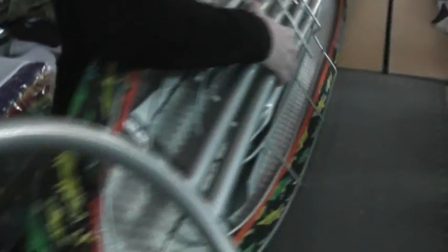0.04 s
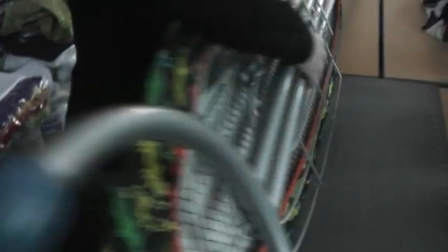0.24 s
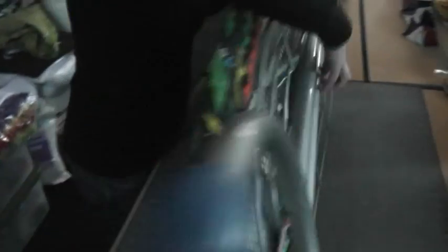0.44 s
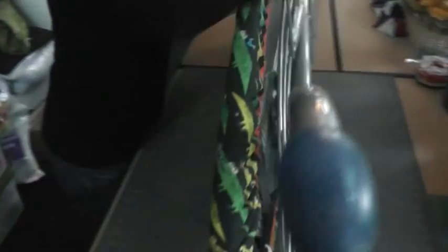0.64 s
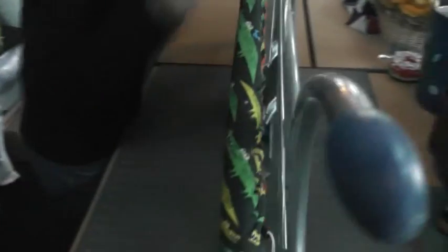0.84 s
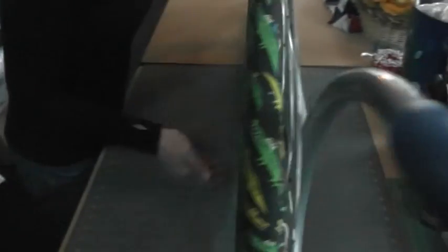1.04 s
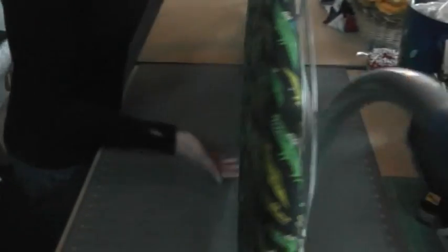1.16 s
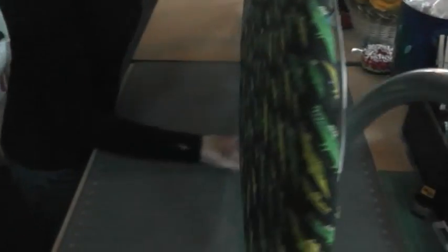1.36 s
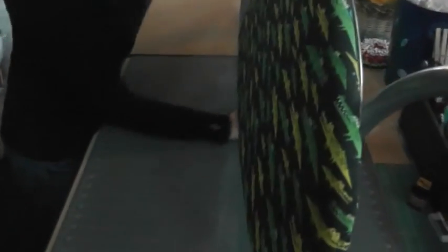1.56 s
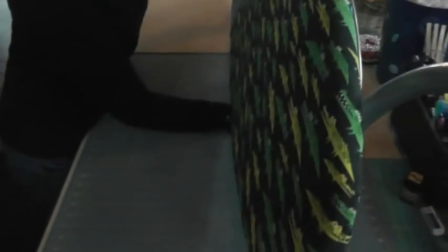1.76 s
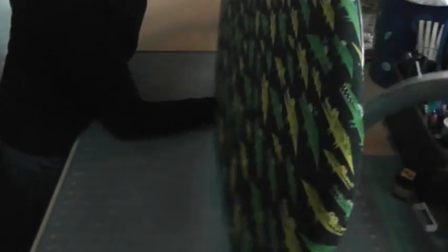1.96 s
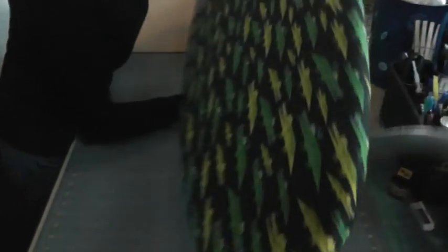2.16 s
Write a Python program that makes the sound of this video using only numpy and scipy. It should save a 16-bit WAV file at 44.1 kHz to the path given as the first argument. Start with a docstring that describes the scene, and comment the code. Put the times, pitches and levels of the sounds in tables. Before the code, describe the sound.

Metal ironing board flipped by hand on a table, with clanks, knocks, a sharp snap and scraping

```python
"""In a small room, a folded metal ironing board is turned over by hand on a table, heard from close by.
Its legs clank on the frame, a latch snaps and a tube rings: noise cracks, damped sines and a noise-like mesh.
The padded board thuds, knocks and booms on the table and finally scrapes along it in noisy slips.
Cloth swishes as shaped noise, over room noise and the faint wavering sines of a fan."""
import sys
import numpy as np
from scipy import signal
from scipy.fft import rfft, irfft, next_fast_len
from scipy.io import wavfile
from scipy.ndimage import map_coordinates

SR = 44100
rng = np.random.default_rng(int(sys.argv[2]) if len(sys.argv) > 2 else 0)


def log_audio(samples):
    """Write samples as a 16-bit WAV file to the path given in sys.argv[1]."""
    # one column per channel
    frames = np.atleast_2d(samples).T
    # limit to full scale, then quantise
    limited = np.clip(frames, -1, 1)
    pcm = np.round(limited * 32767).astype(np.int16)
    wavfile.write(sys.argv[1], SR, pcm)


N = 97108
T = np.arange(int(.8 * SR)) / SR  # time within one blow [s]

# Colours and mode levels are relative; tilt is about 1 kHz and held below 150 Hz.
# still room noise: (frequency [Hz], level [dB])
FLOOR_COLOUR = [(15, -61), (25, -29), (117, -24.5), (276, -12.5), (358, -3.5), (441, -21), (989, -21.5),
                (1160, -21), (2740, -29), (7370, -29), (12800, -48), (16600, -70.5), (22000, -120)]
FLOOR_DB = -69.5
# fan hum and whine: (frequency [Hz], level [dB], waver rate [1/s])
FAN_TONES = [(365.6, -66, 17), (11980, -91.5, 7.4)]
# low air noise, independent left and right: (frequency [Hz], level [dB])
AIR_COLOUR = [(20, -6), (40, 10), (75, -26), (130, 2), (300, -16), (1000, -58)]
AIR_DB = -72.5
# room decay: (frequency [Hz], t60 [s])
ROOM_T60 = [(100, 0.26), (500, 0.5), (3000, 0.38), (10000, 0.34)]
ROOM_DB, ROOM_RISE_S, WALLS_T60_S = -13, 0.0048, .16
# side against middle: (frequency [Hz], level [dB])
SIDE_COLOUR = [(30, -14), (70, -8), (160, -11), (1000, -10), (2500, -11.5), (4800, -14.5), (8000, -14),
               (12000, -8)]
LEFT_DB = -0.38  # right gets the opposite
LOW_CUT_HZ, TOP_HZ = 47, 12900

# cloth under the hands: (start [s], end [s], level [dB])
SWISHES = [(-.05, 0.28, -65), (0.608, 0.685, -57), (1.286, 1.46, -72.5), (1.506, 1.79, -61)]
# cloth noise: (frequency [Hz], level [dB])
SWISH_COLOUR = [(200, 1), (700, 2.5), (2000, -0.5), (5000, -1), (8000, -2), (11000, -7.5), (12800, -10.5)]
SWISH_RISE_S, SWISH_FALL_S = 0.11, 0.069
SWISH_SWING_DB, SWISH_SWING_PER_S = 1.1, 60.6

# light touches of wire and fittings: (time [s], level [dB], tilt [dB/octave], t60 [s])
TICKS = [(.138, -62.5, 1, 0.29), (0.2443, -49, 11, 0.016), (.358, -41, 0.5, 0.21), (.696, -49, -8.5, .015),
         (.746, -59.5, -6, 0.054), (.859, -58, 19.5, 0.018), (0.987, -65, -6, 0.019),
         (1.1618, -60.5, -4, 0.052), (1.25, -59, 4.5, 0.33), (1.3259, -46.5, -2, 0.027),
         (1.893, -44.5, -5, 0.079)]
# tick noise: (frequency [Hz], level [dB])
TICK_COLOUR = [(200, -16), (1100, -5), (2400, 4), (5000, -1.5), (9000, -18), (12800, -30.5)]

# table booming under the board's weight: (time [s], level [dB])
BOOMS = [(.185, -45), (.44, -59), (.835, -54), (1.178, -51), (1.534, -56), (1.94, -49)]
# boom noise: (frequency [Hz], level [dB])
BOOM_COLOUR = [(30, -31), (55, -7), (75, -4), (115, -9), (150, -14), (400, -46.5)]
BOOM_RISE_S, BOOM_T60_S = 0.018, 0.26

# board dragging on the table: (time [s], level [dB])
DRAG_LEVEL = [(0, -57), (.17, -64), (.3, -51.5), (.5, -51.5), (.65, -60.5), (.87, -59), (.98, -77),
              (1.1, -63), (1.3, -63), (1.46, -66), (1.58, -66), (1.87, -67.5), (2.2, -58)]
# drag rumble: (frequency [Hz], level [dB])
DRAG_COLOUR = [(25, -12.5), (50, -13.5), (90, 0.5), (170, -1.5), (300, -1), (600, -9.5), (1200, -13.5),
               (2500, -26.5), (8000, -40)]
DRAG_SWING_DB, DRAG_SWING_PER_S = 1.3, 35
# edge scraping at the end: (time [s], level [dB])
SCRAPE_LEVEL = [(1.92, -77.5), (1.96, -62), (2.035, -52.5), (2.047, -48), (2.105, -46), (2.115, -43),
                (2.145, -44.5), (2.165, -42), (2.2, -45)]
# scrape noise: (frequency [Hz], level [dB])
SCRAPE_COLOUR = [(30, -22), (85, 4), (130, -17.5), (220, 3.5), (400, -3), (600, 0.5), (780, -2.5),
                 (1000, -13), (1400, -11.5), (2500, -26), (4000, -21.5), (7000, -27), (9000, -41),
                 (12800, -49.5)]
SLIPS_PER_S, SLIP_SCATTER_DB, SLIP_DECAY_S = 344, 2, .004
SCRAPE_GRIT = 1  # steady noise against slips, rms ratio
# resonances under the scrape: (frequency [Hz], level [dB])
SCRAPE_MODES = [(240, -8), (364, 6), (437, 6), (547, 6.5)]
SCRAPE_MODE_HALF_WIDTH_HZ = 11.3

# padded board bumping on the table: (time [s], level [dB], tilt [dB/octave])
THUDS = [(0.024, -46, -10), (0.098, -52, -26), (0.1808, -40.5, 1), (0.212, -47, 4), (.231, -52.5, -8),
         (0.257, -46, 2.5), (.268, -44, -18), (.31, -52, -4), (.356, -45.5, 3.5), (.442, -42.5, 3),
         (0.512, -47.5, 11), (0.7318, -56.5, 3), (0.745, -58.5, 5.5), (0.8308, -49, 2.5),
         (1.1617, -35.5, -1), (1.1753, -43, -5), (1.195, -50, 4), (1.25, -57, -12), (1.325, -55.5, 3),
         (1.55, -60, -12), (1.922, -43, -13), (1.95, -46.5, -14)]
# thud noise: (frequency [Hz], level [dB])
THUD_COLOUR = [(30, -37), (70, -24), (120, -7), (190, 1.5), (280, -1), (450, -4), (650, -13.5), (1000, -24),
               (2000, -33.5), (5000, -40.5), (12000, -70.5)]
# thud decay: (frequency [Hz], t60 [s])
THUD_T60 = [(70, 0.65), (200, 0.28), (600, 0.12), (3000, .08)]
# board modes: (frequency [Hz], level [dB], t60 [s])
BOARD_MODES = [(177.4, -5, 0.13), (202.5, -5, 0.12), (243.7, 5.5, 0.064), (281, -6, 0.059), (404, -6, 0.05),
               (560, -12, 0.034)]
THUD_DB, BOARD_DB, BOARD_LOW_CUT_HZ = -2, -0.5, 140

# hard knocks of the rim: (time [s], level [dB], pitch of the struck spot [Hz])
KNOCKS = [(0.0161, -51, 642), (.1805, -36.5, 472), (0.2453, -47, 813), (0.357, -48, 526), (.511, -39, 1883),
          (0.7306, -53, 393), (0.747, -52, 1057), (.8305, -51.5, 1313), (.988, -59, 1140),
          (1.088, -62, 770), (1.1615, -52, 520), (2.112, -41, 535)]
# knock noise: (frequency [Hz], level [dB])
KNOCK_COLOUR = [(60, -16), (200, -7), (400, 8.5), (700, 3.5), (1150, -15), (1700, -15), (2500, -38),
                (8000, -37)]
KNOCK_T60_S, SPOT_T60_S, SPOT_DB = .03, .06, -1

# crowded modes of the mesh: (frequency [Hz], level [dB])
MESH_COLOUR = [(60, -30), (170, -5), (400, -6.5), (900, -3.5), (1600, -3.5), (2600, -3.5), (3500, -2.5),
               (4500, 0), (6000, -2.5), (8000, -5), (10500, -7), (12800, -28)]
# mesh decay: (frequency [Hz], t60 [s])
MESH_T60 = [(150, 0.67), (1000, 0.47), (3000, 0.45), (7000, 0.24), (12000, 0.093)]
MESH_DB = -9

# loose leg tube chattering: (time [s], level [dB])
TUBE_HITS = [(.4497, -32.5), (0.4532, -30), (1.1615, -65.5)]
# tube modes: (frequency [Hz], level [dB], t60 [s])
TUBE_MODES = [(1854, -19, 0.4), (2285, -12, 0.18), (2324, -2.5, 0.35), (2392, -5, .34), (2500, 3, 0.06),
              (2616, -4, 0.31), (2620, -13, .2), (3300, -18, .29), (4770, -14, 0.36), (4946, -6, 0.33),
              (5050, -10, .16), (5319, -17, .22)]
# tube crack noise: (frequency [Hz], level [dB])
TUBE_CRACK_COLOUR = [(200, -29), (1900, -24), (2450, 13), (3000, -11.5), (4200, -16), (5000, 3.5),
                     (5900, -39), (7500, -16), (10000, -16.5), (12800, -39)]
TUBE_CRACK_T60_S, TUBE_MESH_DB, TUBE_RING_DB = .075, -5, -8.5

# latch snapping against its stop: (time [s], level [dB], ring [dB])
SNAPS = [(1.9016, -24.5, -2), (1.9084, -34.5, -7)]
# latch modes, short and bright: (frequency [Hz], level [dB], t60 [s])
LATCH_MODES = [(1312, -17.5, .15), (1868, -17.5, 0.32), (2590, -11, 0.23), (3636, -17, .22),
               (3900, -19, 0.22), (4330, -7, 0.09), (4517, -6.5, 0.046), (4710, 0, 0.078),
               (4680, 0.5, 0.044), (5240, -11, .08), (6700, -13, 0.2)]
# latch crack noise: (frequency [Hz], level [dB])
LATCH_CRACK_COLOUR = [(100, -28.5), (400, -12.5), (900, -3), (1700, -15), (2700, 6.5), (3500, -5.5),
                      (4600, 6.5), (5800, -0.5), (8000, -4), (10700, -5.5), (12800, -16.5)]
LATCH_CRACK_T60_S, LATCH_CRACK_DB = 0.058, 0.5

# legs striking the frame: (time [s], level [dB], tilt of crack and mesh [dB/octave], ring [dB])
CLANKS = [(0.2669, -26.5, -1, -0.5), (0.3147, -53, 4.5, -7.5), (.353, -43.5, -5, -8),
          (.357, -45.5, -5, -10), (.511, -43.5, -4.5, -23)]
# frame modes: (frequency [Hz], level [dB], t60 [s])
FRAME_MODES = [(1594, -2.5, 0.19), (1949, -15, 0.2), (2170, -18, .2), (2400, -3, 0.14), (4060, -7, 0.11),
               (4160, -2, .12), (4310, -6.5, 0.12), (4590, 0, 0.19), (5000, -9.5, .22), (5450, -16, .2),
               (5900, -10, .14), (6995, -11, .15), (7165, -17, 0.54), (9600, -17, 0.31)]
# frame crack noise: (frequency [Hz], level [dB])
FRAME_CRACK_COLOUR = [(100, -31), (900, -23), (1600, -3.5), (2400, -2.5), (3300, -18.5), (4100, 9),
                      (4900, 9), (5600, -1), (7400, 2.5), (9000, -11.5), (12800, -24)]
FRAME_CRACK_T60_S, FRAME_CRACK_DB, FRAME_RING_DB = .035, 6.5, -8
CONTACT_S = 0.00019  # rise of a leg or latch blow


def amp(db):
    """Amplitude factor from decibels."""
    return 10 ** (np.asarray(db) / 20)


def unit(x):
    """Scales x to rms 1."""
    return x / np.sqrt(np.mean(x ** 2) + 1e-20)


def along(points, hz):
    """Interpolates (frequency [Hz], value) points on a log axis."""
    f, v = np.transpose(points)
    return np.interp(np.log(hz + 1), np.log(f + 1), v)


def curve(rows):
    """One value per sample from (time [s], value) rows."""
    return np.interp(np.arange(N) / SR, *np.transpose(rows))


def wobble(knots_per_s):
    """A smooth random curve through normally distributed knots."""
    knots = rng.standard_normal(4096)
    return map_coordinates(knots, [np.arange(N) * knots_per_s / SR], mode="wrap")


def filtered(x, gain):
    """Applies a frequency-dependent gain to x."""
    n = x.shape[-1]
    m = next_fast_len(n + 8192)
    return irfft(rfft(x, m) * gain(np.fft.rfftfreq(m, 1 / SR)), m)[..., :n]


def noise(colour, size, tilt_db=0):
    """Coloured noise of rms 1, tilted per octave."""
    def gain(hz):
        octaves = np.log2(np.maximum(hz, 150) / 1000)
        return amp(along(colour, hz) + tilt_db * octaves)
    return unit(filtered(rng.standard_normal(size), gain))


def dying(x, t60s):
    """Lets each frequency of x die at its own speed."""
    hz, t, z = signal.stft(x, SR, nperseg=256)
    decay = amp(-60 * t / along(t60s, hz)[:, None])
    return signal.istft(z * decay, SR, nperseg=256)[1][..., :x.shape[-1]]


def fade(t60_s):
    """Exponential decay, down 60 dB at t60_s."""
    return np.exp(-np.log(1000) * T / t60_s)


def ring(modes, scatter_db, rough):
    """Damped modes with scattered levels and a phase on a random walk [rad/sqrt(s)]."""
    drift = np.cumsum(rng.standard_normal((len(modes), len(T))), axis=1) / np.sqrt(SR)
    out = np.zeros(len(T))
    for (hz, db, t60_s), walk in zip(modes, drift):
        level = amp(db + scatter_db * rng.standard_normal())
        out += level * fade(t60_s) * np.sin(2 * np.pi * hz * T + rough * walk)
    return out


def add(track, s, sound):
    """Mixes a sound in at s seconds."""
    i = max(round(s * SR), 0)
    track[i:i + len(sound)] += sound[:N - i]


def thinned(x, hz):
    """Takes away the bass below hz, third-order high-pass."""
    return signal.sosfilt(signal.butter(3, hz, "highpass", fs=SR, output="sos"), x)


def fan():
    """Room noise with fan tones whose level and phase waver."""
    t = np.arange(N) / SR
    out = amp(FLOOR_DB) * noise(FLOOR_COLOUR, N)
    for hz, db, rate in FAN_TONES:
        level = amp(db + 0.5 * wobble(rate)) * np.sqrt(2)  # sine rms to peak
        out += level * np.sin(2 * np.pi * hz * t + .5 * wobble(rate))
    return out


def cloth():
    """Sleeves and hands slide over the cover: noise under linear ramps, its level flickering."""
    t = np.arange(N) / SR
    level = np.zeros(N)
    for start, end, db in SWISHES:
        rise = np.clip((t - start) / SWISH_RISE_S + .5, 0, 1)
        fall = np.clip((end - t) / SWISH_FALL_S + .5, 0, 1)
        level += amp(db) * rise * fall
    return level * amp(SWISH_SWING_DB * wobble(SWISH_SWING_PER_S)) * noise(SWISH_COLOUR, N)


def ticks():
    """Small fittings touch: decaying noise."""
    out = np.zeros(N)
    for s, db, tilt_db, t60_s in TICKS:
        add(out, s, amp(db) * noise(TICK_COLOUR, len(T), tilt_db) * fade(t60_s))
    return out


def booms():
    """The table swells and dies slowly in the bass."""
    out = np.zeros(N)
    swell = fade(BOOM_T60_S) * (1 - np.exp(-T / BOOM_RISE_S))
    for s, db in BOOMS:
        add(out, s, amp(db) * noise(BOOM_COLOUR, len(T)) * swell)
    return out


def dragging():
    """The board rumbles as it shifts; at the end its edge scrapes in uneven slips through resonances."""
    rumble_level = amp(curve(DRAG_LEVEL) + DRAG_SWING_DB * wobble(DRAG_SWING_PER_S))
    rumble = rumble_level * noise(DRAG_COLOUR, N)

    slips = (rng.random(N) < SLIPS_PER_S / SR) * amp(SLIP_SCATTER_DB * rng.standard_normal(N))
    grains = signal.fftconvolve(slips, np.exp(-T / SLIP_DECAY_S))[:N] * rng.standard_normal(N)
    coloured = unit(filtered(grains, lambda hz: amp(along(SCRAPE_COLOUR, hz))))
    scrape = coloured + SCRAPE_GRIT * noise(SCRAPE_COLOUR, N)

    def resonance(hz):
        width = SCRAPE_MODE_HALF_WIDTH_HZ
        return 1 + sum(amp(db) / (1 + ((hz - f) / width) ** 2) for f, db in SCRAPE_MODES)
    return rumble + amp(curve(SCRAPE_LEVEL)) * unit(filtered(scrape, resonance))


def thuds():
    """Soft blows ring the board and shake the table."""
    out = np.zeros(N)
    for s, db, tilt_db in THUDS:
        table = amp(THUD_DB) * dying(noise(THUD_COLOUR, len(T), tilt_db), THUD_T60)
        board = amp(BOARD_DB) * ring(BOARD_MODES, scatter_db=0.0, rough=4.7)
        add(out, s, amp(db) * (table + board))
    return out


def knocks():
    """The rim meets the table with a short, dry knock; the struck spot rings briefly."""
    out = np.zeros(N)
    for s, db, hz in KNOCKS:
        knock = noise(KNOCK_COLOUR, len(T)) * fade(KNOCK_T60_S)
        spot = amp(SPOT_DB) * np.sin(2 * np.pi * hz * T) * fade(SPOT_T60_S)
        add(out, s, amp(db) * (knock + spot))
    return out


def mesh(tilt_db=0):
    """Crowded modes of the steel mesh, shaken by leg, latch and tube: noise dying by frequency."""
    return amp(MESH_DB) * dying(noise(MESH_COLOUR, len(T), tilt_db), MESH_T60)


def tube():
    """A leg tube chatters against its stop, shakes the mesh and rings on."""
    out = np.zeros(N)
    for s, db in TUBE_HITS:
        crack = noise(TUBE_CRACK_COLOUR, len(T)) * fade(TUBE_CRACK_T60_S)
        shaken = amp(TUBE_MESH_DB) * mesh()
        tone = amp(TUBE_RING_DB) * ring(TUBE_MODES, scatter_db=2.6, rough=5.9)
        add(out, s, amp(db) * (crack + shaken + tone))
    return out


def latch():
    """The latch snaps home and bounces once: crack, mesh and a bright ring."""
    out = np.zeros(N)
    for s, db, ring_db in SNAPS:
        crack = amp(LATCH_CRACK_DB) * noise(LATCH_CRACK_COLOUR, len(T)) * fade(LATCH_CRACK_T60_S)
        ping = amp(ring_db) * ring(LATCH_MODES, scatter_db=1.0, rough=10.4)
        add(out, s, amp(db) * (crack + mesh() + ping) * np.minimum(T / CONTACT_S, 1))
    return out


def clanks():
    """A leg hits the frame: a crack, the frame's modes and the clash of the mesh."""
    out = np.zeros(N)
    for s, db, tilt_db, ring_db in CLANKS:
        crack = amp(FRAME_CRACK_DB) * noise(FRAME_CRACK_COLOUR, len(T), tilt_db) * fade(FRAME_CRACK_T60_S)
        frame = amp(FRAME_RING_DB + ring_db) * ring(FRAME_MODES, scatter_db=0.3, rough=5.6)
        add(out, s, amp(db) * (crack + mesh(tilt_db) + frame) * np.minimum(T / CONTACT_S, 1))
    return out


def scene():
    """Everything sounds in a small room; nearby walls spread it a little between the ears."""
    board = thinned(thuds() + knocks(), BOARD_LOW_CUT_HZ)
    dry = cloth() + ticks() + booms() + dragging() + board + tube() + latch() + clanks()

    tail = dying(rng.standard_normal(len(T)), ROOM_T60) * np.minimum(T / ROOM_RISE_S, 1)
    room = signal.fftconvolve(dry, tail / np.linalg.norm(tail))[:N]
    mid = dry + amp(ROOM_DB) * room + fan()

    walls = rng.standard_normal(len(T)) * fade(WALLS_T60_S)
    spread = signal.fftconvolve(mid, walls / np.linalg.norm(walls))[:N]
    side = filtered(spread, lambda hz: amp(along(SIDE_COLOUR, hz)))

    air = amp(AIR_DB) * noise(AIR_COLOUR, (2, N))
    return np.array([amp(LEFT_DB) * (mid + side), amp(-LEFT_DB) * (mid - side)]) + air


def record(dry):
    """The recorder cuts the deep bass and keeps nothing above its band limit."""
    # 200 Hz wide edge centred on TOP_HZ
    return filtered(thinned(dry, LOW_CUT_HZ), lambda hz: np.clip((TOP_HZ - hz) / 200 + .5, 0, 1))


dry = scene()
out = record(dry)
log_audio(out)
```